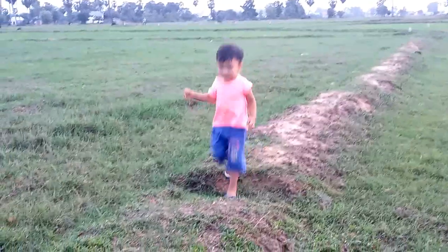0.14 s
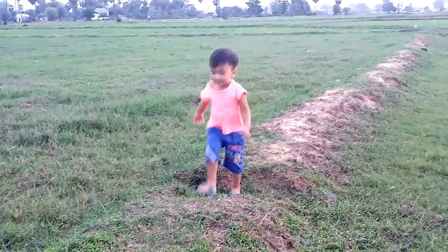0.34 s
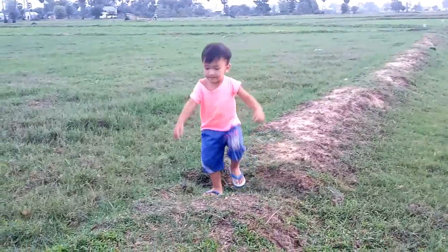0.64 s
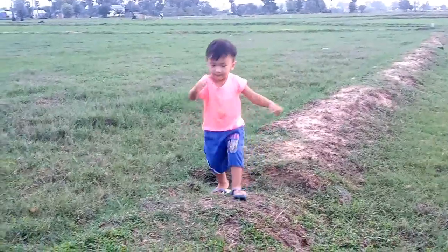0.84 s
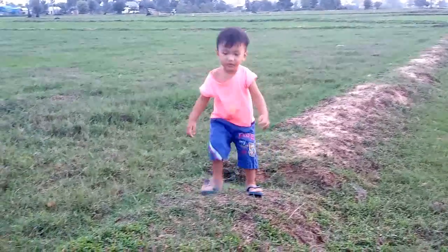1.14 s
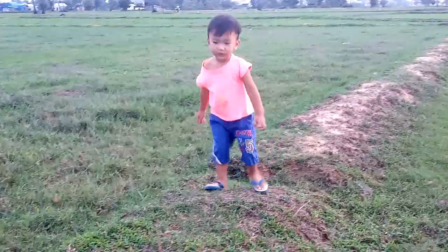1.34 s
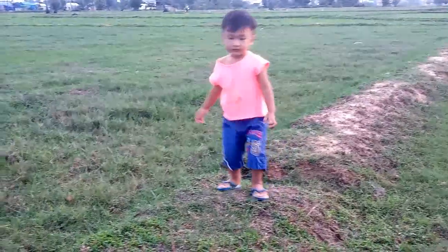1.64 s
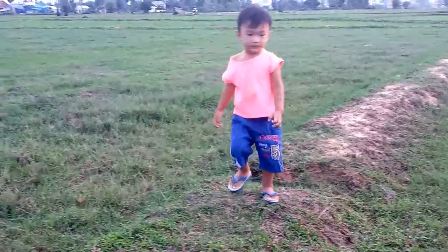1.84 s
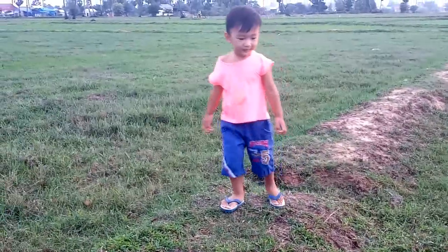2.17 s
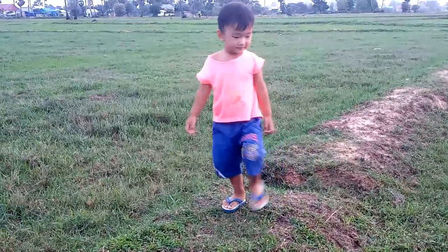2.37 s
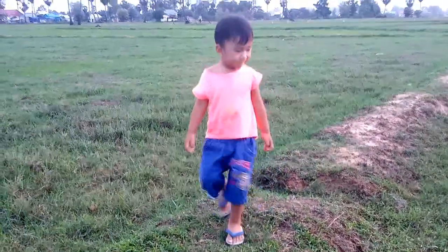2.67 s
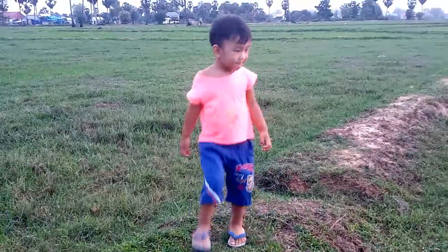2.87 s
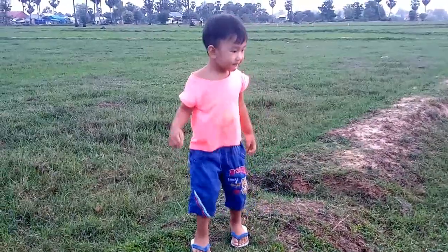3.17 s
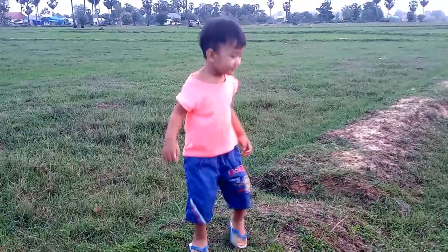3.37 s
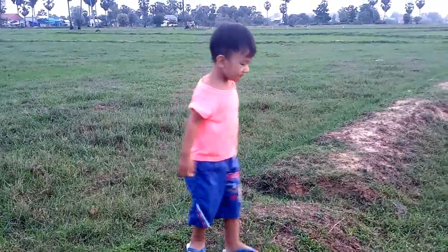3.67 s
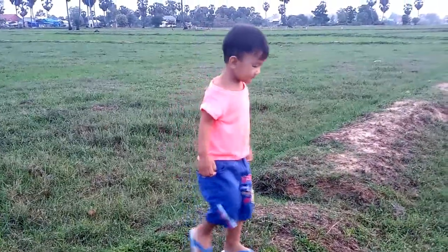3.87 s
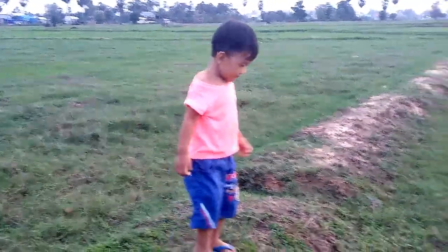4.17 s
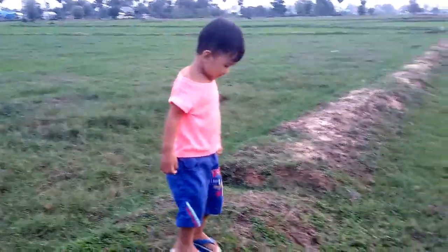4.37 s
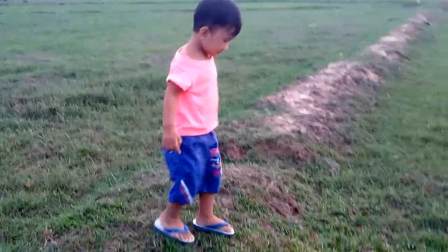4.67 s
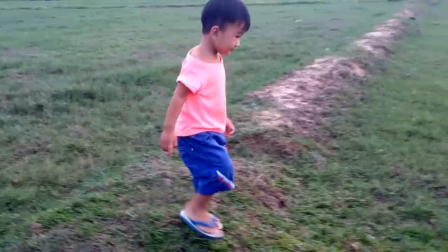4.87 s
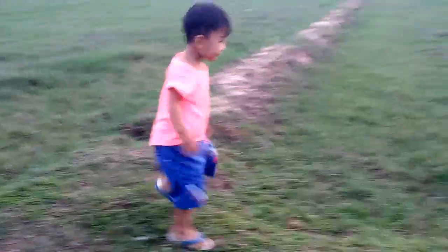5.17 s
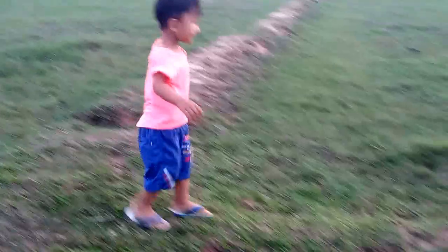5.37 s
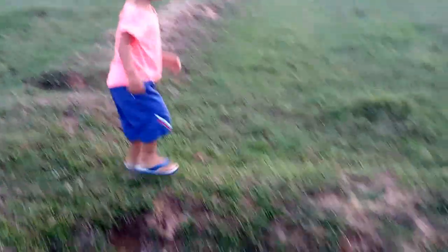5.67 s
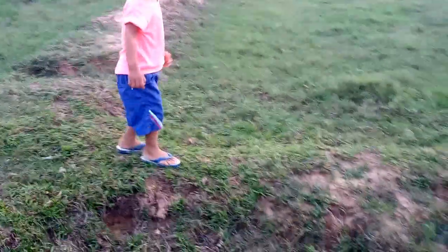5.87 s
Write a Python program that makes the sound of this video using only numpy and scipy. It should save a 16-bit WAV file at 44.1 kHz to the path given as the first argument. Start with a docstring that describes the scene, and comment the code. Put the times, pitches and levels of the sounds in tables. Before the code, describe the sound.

Crickets and frogs call in an open field over a distant thudding engine, with footsteps in grass and a small bird whistling.

```python
"""Crickets chirp, one close by, each chirp a train of wing strokes, in an open grassy field. Under them
a far one-cylinder engine thuds, wind nudges the microphone and the outdoor air hisses. Small frogs buzz
through their vocal sacs in volleys. Footsteps brush the grass and snap stalks, and a sandal slaps once.
Past halfway a small bird whistles and a close frog joins in; the feet end in a long rustle."""
import sys
import numpy as np
from scipy import signal
from scipy.fft import rfft, irfft, next_fast_len
from scipy.io import wavfile
from scipy.ndimage import uniform_filter1d

SR = 44100
rng = np.random.default_rng(int(sys.argv[2]) if len(sys.argv) > 2 else 0)


def dump_mix(stems):
    """Bounce the given channels to the path in sys.argv[1] as a 16-bit WAV at rate SR."""
    frames = np.atleast_2d(stems).T  # one column per channel
    limited = np.clip(frames, -1, 1)  # hard clip at full scale
    pcm = np.round(limited * 32767).astype(np.int16)
    wavfile.write(sys.argv[1], SR, pcm)


N = 265482
T = np.arange(N) / SR

# Levels are fader settings, ahead of each layer's trim and pan.
# even runs of chirps, near and right-hand cricket: (end of first chirp [s], period [s], chirps [count])
NEAR_CRICKET_RUNS = [(.069, .12, 14), (1.755, .12035, 25), (4.776, .1175, 12)]
RIGHT_CRICKET_RUNS = [(.022, .1145, 19), (2.19, .1179, 17), (4.187, .115, 11), (5.478, .119, 6)]
# level rides of those two crickets: (time [s], level [dB])
NEAR_CRICKET_RIDE = [(0, -57.5), (1, -55.5), (1.5, -55), (2.6, -55), (3.3, -58), (3.9, -58), (4.45, -55.5),
                     (5.15, -57.5), (5.5, -60.5), (6, -61)]
RIGHT_CRICKET_RIDE = [(0, -47.5), (1.2, -52), (1.9, -50.5), (6, -49.5)]
# engine speed: (time [s], firing rate [1/s])
FIRING_RATE = [(0, 20.5), (1.1, 18.8), (2, 19.75), (3.45, 20.5), (4.7, 19.35), (6.02, 19.8)]
# the engine's loudness as the air carries it: (time [s], level [dB])
ENGINE_RIDE = [(0, -47.5), (.6, -51.5), (.95, -55.5), (1.1, -43), (1.8, -43.5), (2.5, -46.5), (3.2, -43),
               (3.8, -43.5), (4.5, -48.5), (5.3, -52.5), (6.02, -48.5)]
# tone of an exhaust thud, the wind and the air with its far frog calls: (frequency [Hz], level [dB])
THUD_EQ = [(25, -25), (60, -20), (90, -2), (125, 5.5), (170, -2.5), (250, -3), (330, -8.5), (420, -27.5),
           (600, -81.5), (1200, -64.5)]
WIND_EQ = [(20, -39), (45, -17), (75, 2.5), (120, 2.5), (180, -3.5), (280, -17), (400, -29), (700, -88),
           (2000, -66)]
AIR_EQ = [(300, 2.5), (600, -7.5), (1200, -6.5), (1800, -0.5), (2400, -1), (3200, 16), (4400, 1),
          (6000, -10), (8000, -4.5), (9800, -3), (10900, -1.5), (11800, -21.5), (15500, -16.5)]
# wind buffets on the microphone: (time [s], level [dB], half-width [s])
WIND_BUFFETS = [(.1, -50, 0.077), (.31, -45.5, 0.051), (2.84, -41.5, 0.016), (3.04, -48, 0.065),
                (3.183, -35, 0.039), (4.28, -39.5, 0.014), (4.85, -40, 0.037), (5.97, -42.5, 0.089)]
# volleys of the frog chorus: (time [s], level [dB], vocal sac pitch [Hz])
FROG_VOLLEYS = [(0.12, -41, 3257), (0.262, -45.5, 3330), (0.365, -44, 3277), (0.521, -42.5, 3417),
                (0.62, -43, 3210), (0.791, -43.5, 3430), (.9, -49.5, 3310), (0.999, -39.5, 3236),
                (1.127, -42, 3410), (1.251, -39, 3360), (1.34, -43, 3250), (1.43, -40.5, 3358),
                (1.495, -41.5, 3400), (1.702, -37, 3286), (1.817, -39.5, 3230), (1.939, -38.5, 3428),
                (2.05, -42, 3271), (2.147, -40, 3366), (2.262, -48, 3510), (2.355, -40.5, 3285),
                (2.45, -47, 3380), (2.63, -46, 3436), (2.751, -48.5, 3170), (2.871, -47.5, 3470),
                (2.953, -47.5, 3400), (3.255, -48.5, 3490), (3.359, -61, 3200), (3.557, -48.5, 3464),
                (3.651, -47.5, 3200), (3.81, -65, 3450), (3.905, -44, 3203), (4.02, -47, 3460),
                (4.244, -42, 3290), (4.378, -47.5, 3180), (4.633, -54, 3186), (4.762, -46.5, 3170),
                (4.883, -46, 3180), (5.02, -47.5, 3290), (5.109, -53, 3370), (5.296, -43, 3296),
                (5.437, -58, 3234), (5.57, -50, 3394), (5.773, -44.5, 3340), (5.987, -38.5, 3374)]
# dry stalks snapping: (time [s], ring level [dB], ring pitch [Hz], crack level [dB])
STALK_SNAPS = [(.13, -53, 7200, -62), (.174, -49, 6300, -70), (.355, -53, 5900, -59),
               (.481, -46, 5620, -70), (0.513, -46, 7160, -54), (.942, -51, 7500, -48),
               (1.532, -49, 6480, -64), (1.772, -51, 5900, -70), (1.883, -46, 6400, -69),
               (1.902, -46, 5500, -68), (2.622, -42.5, 6650, -46), (3.254, -51, 6500, -77),
               (3.449, -47, 6500, -76), (3.953, -45, 6640, -62), (5.323, -45, 6400, -60)]
# feet brushing the grass: (time [s], level [dB], half-width [s])
FOOTFALLS = [(.18, -76, 0.047), (.51, -66.5, 0.043), (1.135, -54.5, 0.017), (1.541, -61.5, 0.028),
             (1.92, -66.5, 0.11), (2.1, -72, 0.11), (2.5, -69, 0.034), (2.91, -66, 0.04), (3.37, -71, 0.11),
             (4.01, -61, 0.044), (4.61, -63, 0.25), (5.01, -62.5, 0.063)]
# tone of a soft brush and a brighter swish of grass: (frequency [Hz], level [dB])
BRUSH_EQ = [(400, -7), (1000, 7), (2000, 19.5), (3500, 28), (5000, 17.5), (7000, 17.5), (9500, 5),
            (12500, -26), (14500, -26), (15800, -13)]
SWISH_EQ = [(600, -24), (1000, -8), (1600, -2), (3200, 5), (5000, 0), (7500, -2.5), (10000, -5),
            (13500, -3.5), (14900, 4)]
# bouts of nearby frogs: (middle of first call [s], period [s], calls [count], level [dB],
# vocal sac pitch [Hz], call length [s], pitch fall per half call [share])
NEARBY_BOUTS = [(0.75, 0, 1, -47.5, 3710, 0.15, 0.0063), (1.937, 0, 1, -45.5, 3420, 0.048, 0.034),
                (2.551, 0.56, 2, -59.5, 1973, 0.14, 0.019), (2.344, .302, 5, -54, 3397, .07, .025),
                (2.51, .31, 5, -54, 3950, .06, 0.027), (2.777, .29, 5, -52, 2984, .06, .06),
                (3.809, 0.031, 1, -51.5, 3365, 0.061, 0.032), (5.298, .228, 2, -46.5, 3160, 0.066, 0.0255),
                (2.283, .45, 2, -56.5, 4200, 0.054, 0.022), (4.926, .305, 2, -48, 3576, 0.033, 0.033),
                (5.581, 0.21, 2, -45.5, 3336, .06, 0)]
# resonances of a sandal slapping the ground: (frequency [Hz], level [dB])
SANDAL_RINGS = [(714, -47.5), (930, -52), (1400, -46), (2180, -41)]
# bird whistles: (start [s], end of climb [s], level [dB], swell [dB], held pitch [Hz], top pitch [Hz],
# scoop depth [Hz], drop length [s])
BIRD_WHISTLES = [(3.33, 3.426, -63, 7, 6700, 7430, 0, .03), (3.86, 4.148, -52.5, 15, 6400, 7380, 0, .078),
                 (4.39, 4.472, -61.5, 11, 6450, 7100, 244, .016),
                 (4.56, 4.851, -51.5, 7, 6355, 7310, 0, .078),
                 (5.06, 5.168, -50.5, 6, 6230, 7040, 1750, .022),
                 (5.23, 5.55, -53, 5, 6230, 7220, 600, .07),
                 (5.783, 5.874, -49.5, 9, 6490, 7100, 1100, .02),
                 (5.944, 6.218, -51, 9, 6340, 7300, 105, .08)]
# level ride of the long rustle: (time [s], level [dB])
RUSTLE_RIDE = [(5.25, -55), (5.33, -43), (5.42, -47.5), (5.53, -37), (5.62, -41), (5.78, -40), (5.9, -45.5),
               (6.02, -49)]
# the two microphone ports ring differently: (frequency [Hz], left boost and right cut [dB])
PORT_EQ = [(3800, -1.5), (5000, 0), (6600, 0.14), (7700, 0.5), (8800, 7), (9900, -4), (11000, -8.5),
           (14000, -1.5)]


def amp(db):
    """Decibels to gain."""
    return 10 ** (np.asarray(db) / 20)


def unit(x):
    """Scales to rms 1."""
    return x / np.sqrt(np.mean(x ** 2) + 1e-20)


def curve(rows):
    """Joins (time [s], value) rows by straight lines."""
    return np.interp(T, *np.transpose(rows))


def add(mix, s, sound):
    """Mixes a sound in from time s."""
    start = int(round(s * SR))
    sound = sound[max(-start, 0):]
    part = mix[max(start, 0):][:len(sound)]
    part += sound[:len(part)]


def gains(eq, size):
    """An EQ curve as gains on the bins of an FFT."""
    hz, db = np.transpose(eq)
    return amp(np.interp(np.log(np.fft.rfftfreq(size, 1 / SR) + 1), np.log(hz), db))


def colour(x, eq):
    """Runs a signal through an EQ curve, to rms 1."""
    size = next_fast_len(N)
    return unit(irfft(rfft(x, size) * gains(eq, size), size)[..., :N])


def swells(rows):
    """Envelope of bell-shaped swells from (time [s], level [dB], half-width [s]) rows."""
    return sum(amp(db) * np.exp(-2 * ((T - s) / width) ** 2) for s, db, width in rows)


def pan(left_db):
    """Channel gains that put the left left_db above the right."""
    return amp(np.array([[left_db], [-left_db]]) / 2)


def field(x, left_db, lag_s, scatter_db, t60):
    """Places a sound: the direct path, later on the left, plus diffuse scatter from the ground."""
    t = np.arange(int(t60 * SR) + 2) / SR
    tail = rng.standard_normal((2, len(t))) * amp(-60 * t / t60)
    tail /= np.linalg.norm(tail, axis=1, keepdims=True)
    direct = np.array([np.pad(x, (int(lag_s * SR), 0))[:N], x])
    scatter = signal.fftconvolve(x[None], tail, axes=1)[:, :N]
    wet = amp(scatter_db)
    return pan(left_db) * (direct + wet * scatter) / np.hypot(1, wet)


def cricket(runs, ride, hz, strokes_per_s, stroke_s, sag, swell_db, strokes):
    """Each wing stroke is a short tone that sags in pitch; strokes grow through a chirp, then stop."""
    ends = np.concatenate([first + period * np.arange(count) for first, period, count in runs])
    loose_ends = ends + .002 * rng.standard_normal(len(ends))  # never quite on the beat
    out, u = np.zeros(N), np.linspace(-1, 1, int(stroke_s * SR))
    window = np.cos(np.pi * u / 2) ** 2
    for end, db in zip(loose_ends, np.interp(ends, *np.transpose(ride))):
        for k, (size, detune, slip) in enumerate(rng.standard_normal((strokes, 3))):
            start = end - stroke_s - (k + .037 * slip) / strokes_per_s  # k counts back from the end
            turns = np.cumsum(hz * (1 + .0024 * detune - sag * u)) / SR
            stroke_db = db + .34 * size - swell_db * (k / strokes) ** 3
            add(out, start, amp(stroke_db) * window * np.sin(2 * np.pi * turns))
    return out


def crickets():
    """One near cricket on the left and two higher ones to the right, each at its own pace."""
    near = cricket(NEAR_CRICKET_RUNS, NEAR_CRICKET_RIDE, hz=8830,
                   strokes_per_s=127, stroke_s=.0052, sag=.024, swell_db=12, strokes=10)
    right = cricket(RIGHT_CRICKET_RUNS, RIGHT_CRICKET_RIDE, hz=9120,
                    strokes_per_s=130, stroke_s=.005, sag=.02, swell_db=9, strokes=10)
    faint = cricket(runs=[(.005, .113, 55)], ride=[(0, -61)], hz=9780,
                    strokes_per_s=130, stroke_s=.004, sag=.025, swell_db=7, strokes=11)
    return (amp(5.3) * field(near, left_db=13, lag_s=.00092, scatter_db=-7, t60=.04)
            + field(right, left_db=-7, lag_s=.0022, scatter_db=-5, t60=.06)
            + field(faint, left_db=-2, lag_s=.0022, scatter_db=-5, t60=.06))


def engine():
    """One dull exhaust thud a firing, uneven in strength, over a wash of far echoes."""
    log_gain = np.log(gains(THUD_EQ, size=8192))
    minimum_phase = np.conj(signal.hilbert(np.r_[log_gain, log_gain[-2:0:-1]]))  # for a hard attack
    thud = np.fft.ifft(np.exp(minimum_phase)).real
    cycles = np.cumsum(curve(FIRING_RATE)) / SR
    firings = np.flatnonzero(np.diff(np.floor(cycles)))
    strong_weak_db = .17 * (-1) ** np.arange(len(firings))
    pulses = np.zeros(N)
    pulses[firings] = amp(strong_weak_db + 3.2 * rng.standard_normal(len(firings)))
    thuds = unit(signal.fftconvolve(pulses, thud)[260:][:N])
    wash = amp(-5) * pan(4.7) * colour(rng.standard_normal((2, N)), THUD_EQ)
    exhaust = field(thuds, left_db=6, lag_s=.0013, scatter_db=-13, t60=.13)
    return amp(curve(ENGINE_RIDE) - .5) * (exhaust + wash)


def wind():
    """A low breeze with short buffets, different at each microphone port."""
    shared = colour(rng.standard_normal(N), WIND_EQ)
    per_port = colour(rng.standard_normal((2, N)), WIND_EQ)
    strength = amp(-49) + amp(3) * swells(WIND_BUFFETS)
    return pan(11.3) * strength * unit(shared + 1.52 * per_port)


def air_and_far_calls():
    """Outdoor air hiss with a blurred wash of far frog calls, coming and going in patches."""
    hiss = colour(rng.standard_normal((2, N)), AIR_EQ)
    spectrogram = signal.stft(hiss, nperseg=512)[2]
    patches = uniform_filter1d(rng.standard_normal(spectrogram.shape[1:]), size=6, axis=0)
    patches_db = 2.2 * unit(uniform_filter1d(patches, size=11, axis=1))
    patchy_hiss = signal.istft(spectrogram * amp(patches_db), nperseg=512)[1][:, :N]
    return amp(-53.5) * pan(7.1) * unit(patchy_hiss)


def croak(sac_hz, length_s, buzz_hz, sac_width_hz, fall, rough):
    """An uneven buzz that arches and falls in pitch; the vocal sac picks out three harmonics."""
    u = np.linspace(-1, 1, int(length_s * SR))
    partial = round(sac_hz / buzz_hz)
    knots = np.linspace(-1, 1, 24)
    jitter, shimmer = (np.interp(u, knots, row) for row in rng.standard_normal((2, len(knots))))
    pitch = sac_hz / partial * (1 - fall * u - .028 * u ** 2 + .02117 * rough * jitter)
    harmonics = partial + np.arange(-1, 2)[:, None]
    resonance = 1 / (1 + ((harmonics / partial - 1) * sac_hz / sac_width_hz) ** 2)
    buzz = (resonance * np.sin(2 * np.pi * harmonics * np.cumsum(pitch) / SR)).sum(0)
    return unit(buzz * np.cos(np.pi * u / 2) * amp(4.07 * rough * shimmer))


def frog_chorus():
    """Many frogs answer each other in volleys over a loose far chorus with some deeper voices."""
    chorus = np.zeros((2, N))

    def from_anywhere(s, call):
        """Each frog's bearing sets how late it reaches the left port."""
        add(chorus[0], s + .0014 * rng.random(), call)
        add(chorus[1], s, call)

    for s, db, hz in FROG_VOLLEYS:
        voices = hz * np.linspace(.87, 1.1, 12)
        for voice_hz, (late, size, detune) in zip(voices, rng.standard_normal((len(voices), 3))):
            sac_hz = voice_hz * (1 + .015 * detune)
            call = croak(sac_hz, length_s=.08, buzz_hz=300, sac_width_hz=140, fall=.04, rough=.8)
            off_centre_db = 340 * (voice_hz / hz - 1) ** 2  # the largest and smallest frogs are fewest
            from_anywhere(s - .037 + .017 * late, amp(db - 18.5 - off_centre_db + size) * call)
    for low_hz, high_hz, db in [(2750, 3700, -62), (1550, 2300, -73.5)]:  # the far chorus
        for when, size, pitch, span in rng.random((320, 4)):
            s = when * N / SR
            sac_hz = low_hz + (high_hz - low_hz) * pitch
            call = croak(sac_hz, .04 + .05 * span, buzz_hz=330, sac_width_hz=150, fall=.04, rough=.7)
            lull_db = 5.3 * (s > 2.5)
            from_anywhere(s - .03, amp(db + 3.2 * size ** 2 - lull_db) * call)
    return amp(3) * pan(11.4) * chorus


def ringing_hits(hits, ring_s):
    """Hits underfoot, each a tuned burst of dying noise: (time [s], level [dB], pitch [Hz])."""
    out, t = np.zeros(N), np.arange(1024) / SR
    for s, db, hz in hits:
        band = signal.butter(1, [hz * .977, hz * 1.074], "band", fs=SR, output="sos")
        ring = signal.sosfilt(band, rng.standard_normal(len(t)) * np.exp(-t / ring_s))
        add(out, s, amp(db) * ring / abs(ring).max())
    return field(out, left_db=17, lag_s=.00057, scatter_db=9.5, t60=.03)


def snapping_stalks():
    """Dry stalks break with a wide crack and a short ring; trodden ones spring back with faint ticks."""
    low_hz, high_hz, crack_s = 4570, 7900, .0032
    snaps = [(s, db, hz) for s, db, hz, _ in STALK_SNAPS]
    ticks = [(when * N / SR, -63 + 7 * size ** 2, low_hz + (high_hz - low_hz) * pitch)
             for when, size, pitch in rng.random((60, 3))]
    bursts = swells([(s + crack_s, db, crack_s) for s, _, _, db in STALK_SNAPS])
    cracks = pan(6) * bursts * colour(rng.standard_normal((2, N)), SWISH_EQ)
    return cracks + ringing_hits(snaps + ticks, ring_s=.0052)


def crackle(eq, grains_per_s, grain_db):
    """Blades of grass flicking past each other: tiny clicks, a few of them large, in a soft hiss."""
    sizes = amp(4.2 * np.minimum(rng.exponential(1, N), 4)) * rng.standard_normal((2, N))
    clicks = sizes * (rng.random(N) < grains_per_s / SR)
    return colour(rng.standard_normal((2, N)) + amp(grain_db) * unit(clicks), eq)


def footsteps():
    """Feet brush the grass; close to the microphone they sizzle more in the top octave."""
    brush = amp(12.5) * pan(10) * crackle(BRUSH_EQ, grains_per_s=780, grain_db=-7)
    highpass = signal.butter(3, 11000, "high", fs=SR, output="sos")
    sizzle = signal.sosfilt(highpass, crackle(SWISH_EQ, grains_per_s=1700, grain_db=-4))
    nearness_db = curve([(0, -10), (3.2, 8), (4, 6.5), (5, 9)])
    return swells(FOOTFALLS) * (brush + pan(2.9) * amp(nearness_db) * sizzle)


def nearby_frogs():
    """A few frogs sit in front of the chorus, croaking once or in short, even bouts."""
    out = np.zeros(N)
    for first, period, count, db, hz, length_s, fall in NEARBY_BOUTS:
        for s in first + period * np.arange(count):
            call = croak(hz, length_s, buzz_hz=248.2, sac_width_hz=130, fall=fall, rough=.66)
            add(out, s - length_s / 2, amp(db) * call)
    return amp(-1) * field(out, left_db=8, lag_s=.00088, scatter_db=-7, t60=.06)


def sandal_slap(at_s):
    """A sandal slaps the ground once and rings briefly."""
    return ringing_hits([(at_s, db, hz) for hz, db in SANDAL_RINGS], ring_s=.0053)


def bird():
    """Thin pure whistles that scoop up to a held pitch, swell as they climb ever faster, and drop."""
    scoop_s, drop_hz, fade_s = .018, 2750, .008
    out = np.zeros(N)
    for start, top, db, swell_db, held_hz, top_hz, scoop_hz, drop_s in BIRD_WHISTLES:
        climb_s = top - start
        t = np.arange(0, climb_s + drop_s, 1 / SR)
        u = np.minimum(t / climb_s, 1)
        climb = .25 * u + .75 * u ** 4
        fall_s = .079 * np.sqrt(climb_s)  # shorter whistles fall faster
        drop = 1 - np.exp(-(np.maximum(t - climb_s, 0) / fall_s) ** 1.4)
        hz = held_hz + (top_hz - held_hz) * climb - scoop_hz * np.exp(-t / scoop_s) - drop_hz * drop
        waver = unit(uniform_filter1d(rng.standard_normal(N), size=200))[:len(t)]
        pitch = uniform_filter1d(hz, size=500) * (1 + .0031 * waver)
        tone = np.sin(2 * np.pi * np.cumsum(pitch) / SR)
        shape_db = np.interp(t, [0, .78 * climb_s, climb_s, t[-1]], [-swell_db, 0, -2, -17])
        fades = np.clip(np.minimum(t, t[-1] - t) / fade_s, 0, 1)
        add(out, start, amp(db + shape_db + .82 * waver[::-1]) * tone * fades)
    return amp(.8) * field(out, left_db=19.5, lag_s=.001116, scatter_db=-9, t60=.12)


def lead_frog(start_s, calls):
    """The nearest frog grows to full strength, hurrying and sinking in pitch from croak to croak."""
    period_s, hurry_s, call_s, warm_up_s = .234, .001, .072, .85
    out = np.zeros(N)
    for k in range(calls):
        since_s = period_s * k - hurry_s * k ** 2
        db = -49.5 - 6 * max(1 - since_s / warm_up_s, 0)
        call = croak(sac_hz=4010 - 22 * k, length_s=call_s, buzz_hz=280,
                     sac_width_hz=200, fall=.045, rough=.7)
        add(out, start_s + since_s - call_s / 2, amp(db) * call)
    return field(out, left_db=14, lag_s=.00075, scatter_db=-7, t60=.06)


def long_rustle():
    """A dense, bright crackle, silent until the feet reach the long grass."""
    wading = amp(curve(RUSTLE_RIDE)) * (T > RUSTLE_RIDE[0][0])
    return pan(7.9) * wading * crackle(SWISH_EQ, grains_per_s=1800, grain_db=-6.5)


def scene():
    """The full mix: animal calls, the background bed and the walk through the grass."""
    animals = crickets() + frog_chorus() + nearby_frogs() + lead_frog(start_s=4.177, calls=9) + bird()
    bed = engine() + wind() + air_and_far_calls()
    walk = snapping_stalks() + footsteps() + sandal_slap(at_s=1.13) + long_rustle()
    return animals + bed + walk


def record(dry):
    """The colour of each microphone port, then a steep high cut."""
    size = next_fast_len(N)
    tilt = gains(PORT_EQ, size)
    heard = irfft(rfft(dry, size) * np.array([tilt, 1 / tilt]), size)[:, :N]
    high_cut = signal.firwin(511, cutoff=15850, window=("kaiser", 9), fs=SR)
    return signal.oaconvolve(heard, high_cut[None], "same")


dry = scene()
out = record(dry)
dump_mix(out)
```